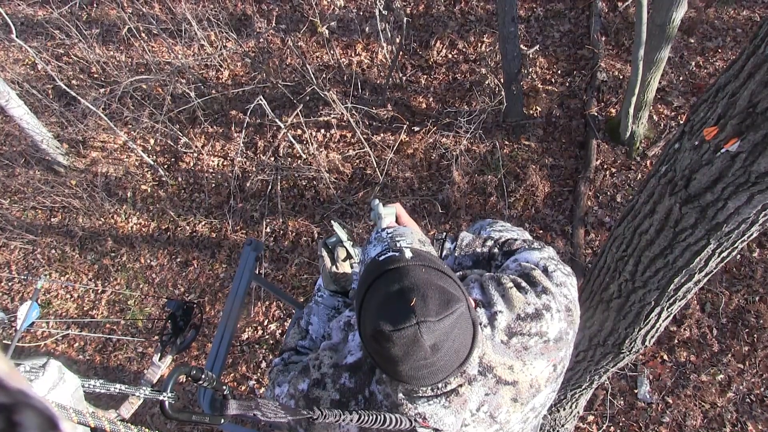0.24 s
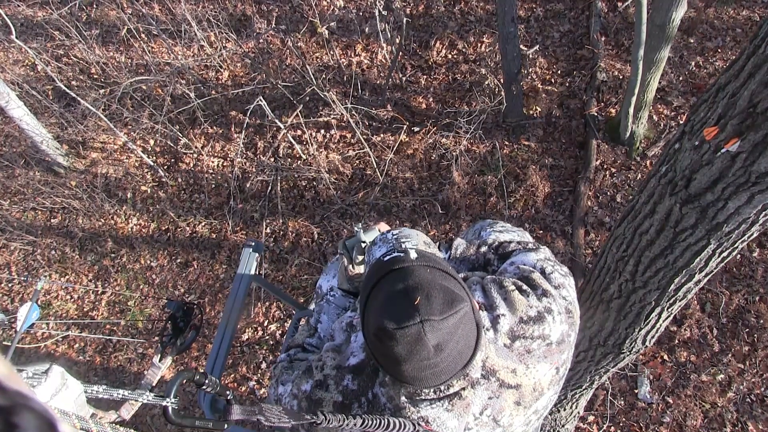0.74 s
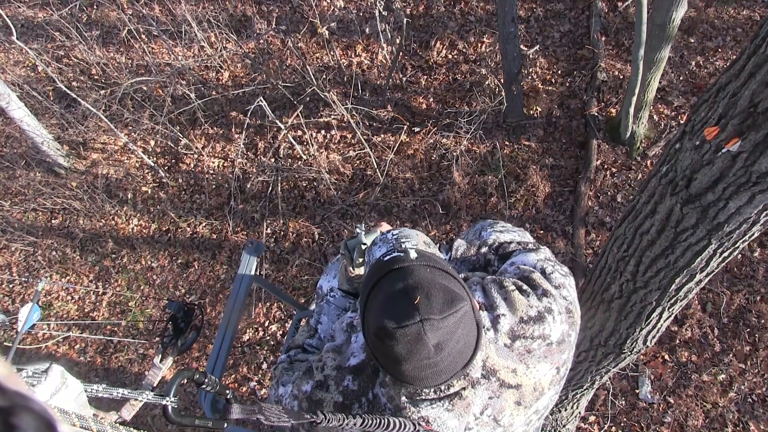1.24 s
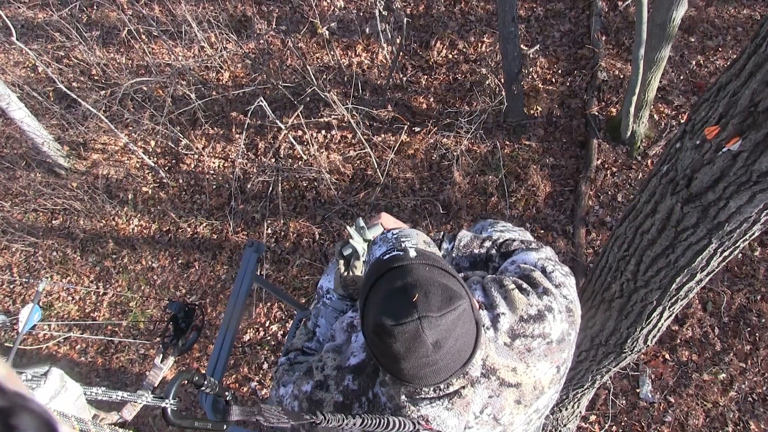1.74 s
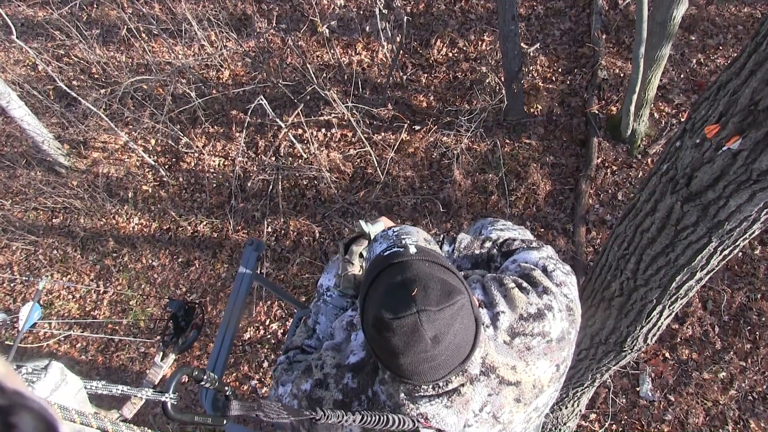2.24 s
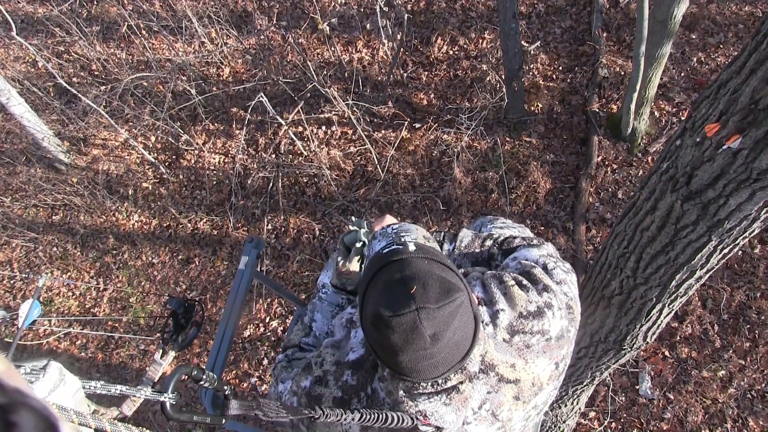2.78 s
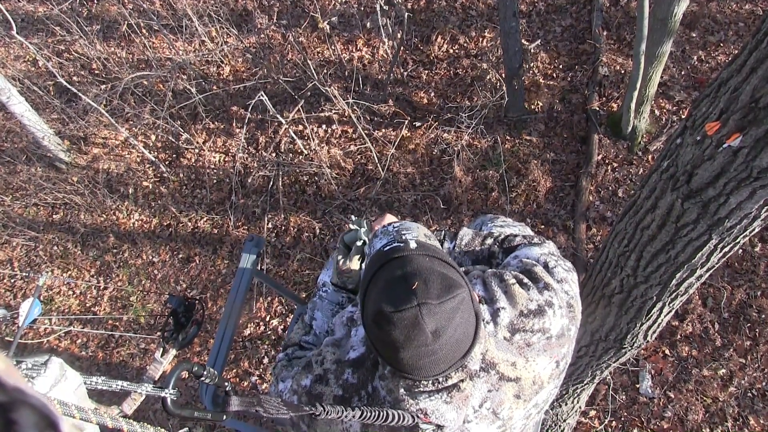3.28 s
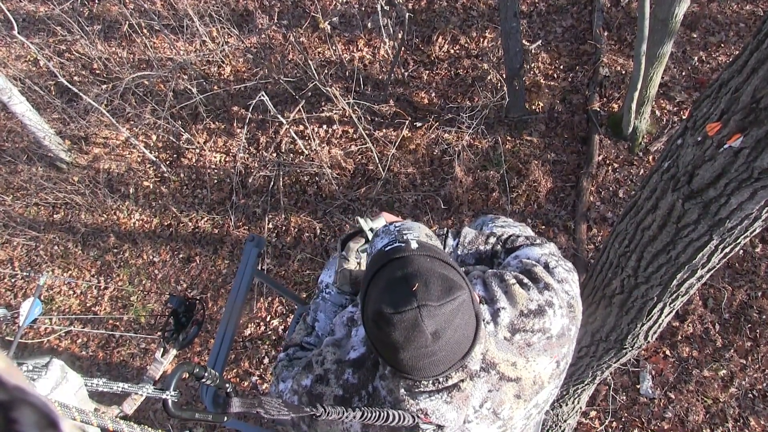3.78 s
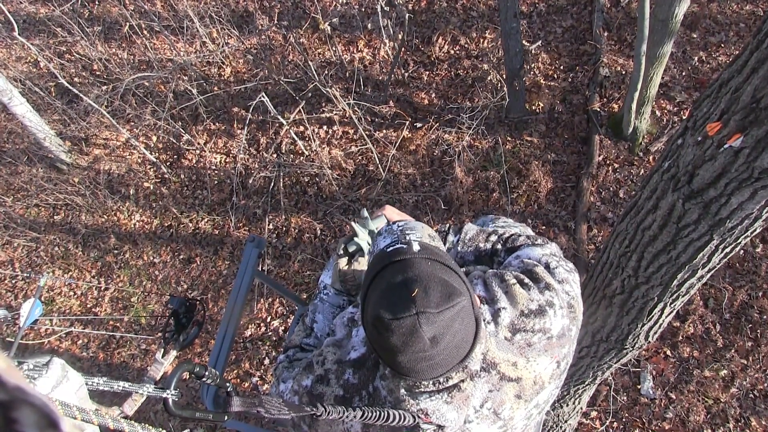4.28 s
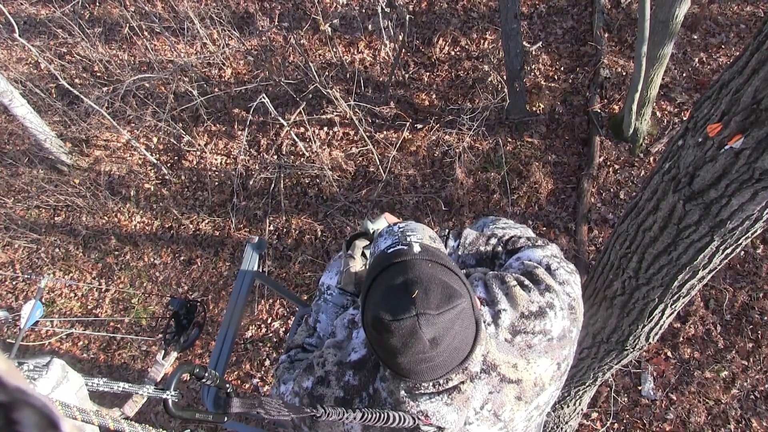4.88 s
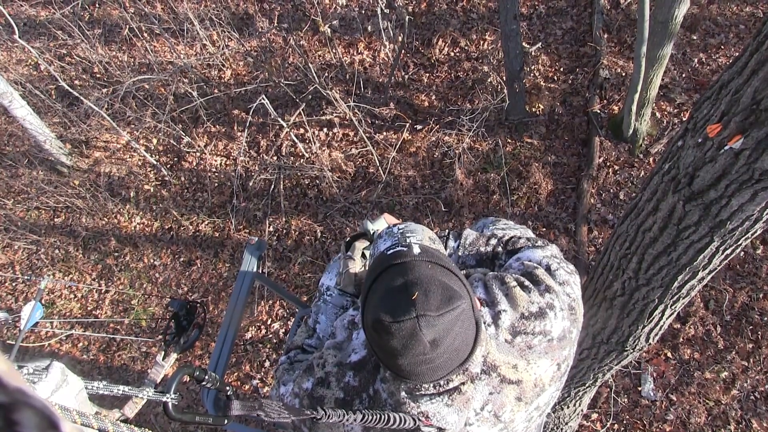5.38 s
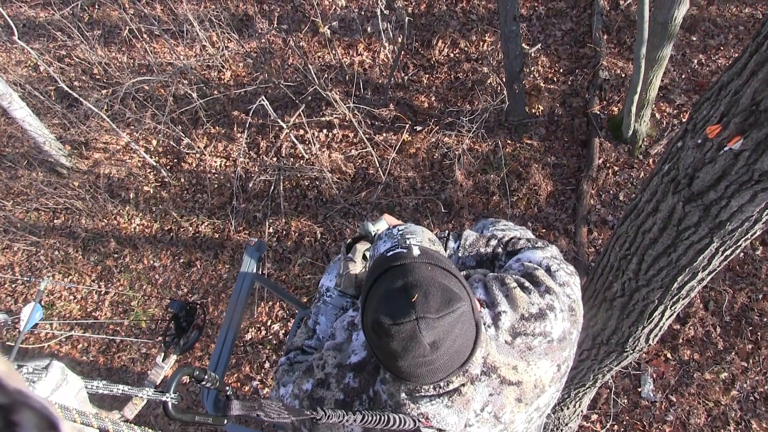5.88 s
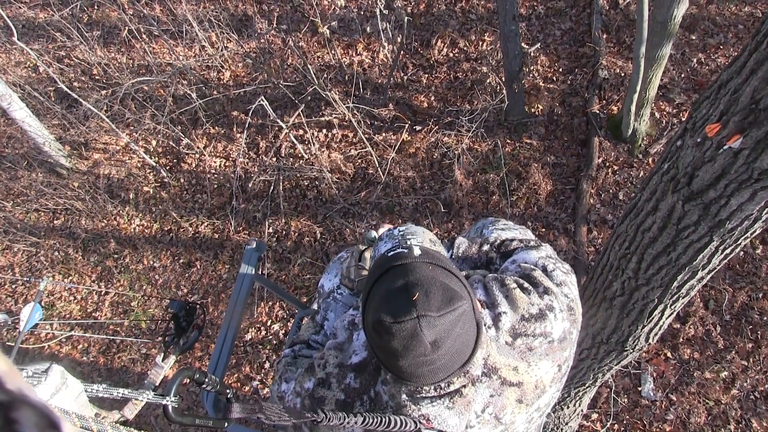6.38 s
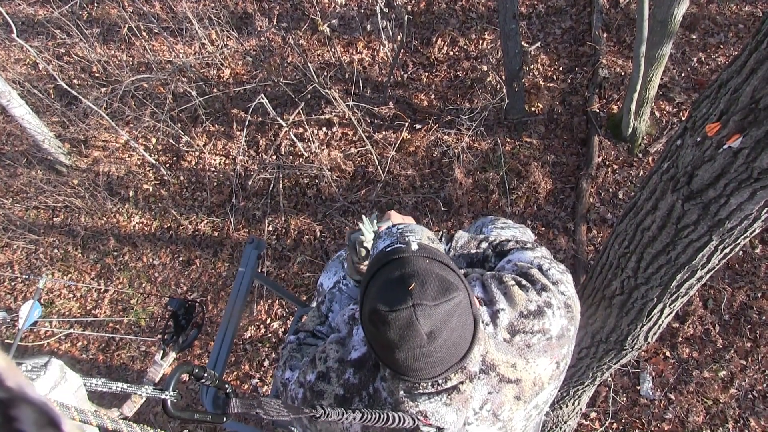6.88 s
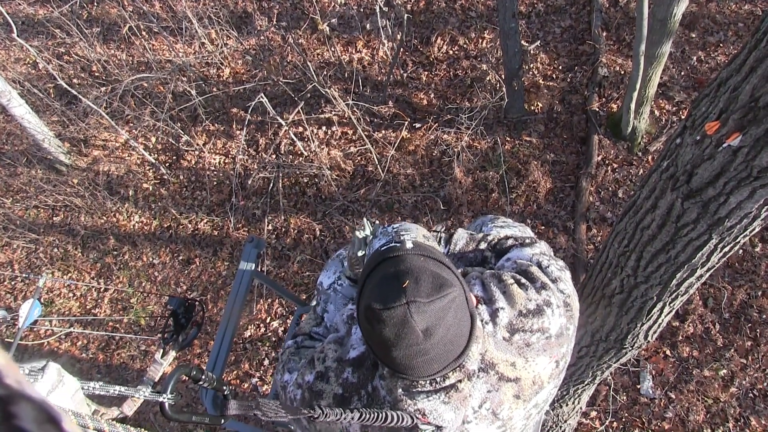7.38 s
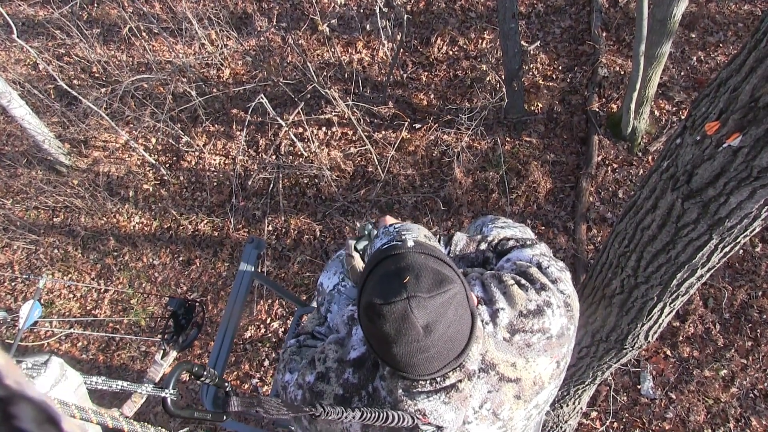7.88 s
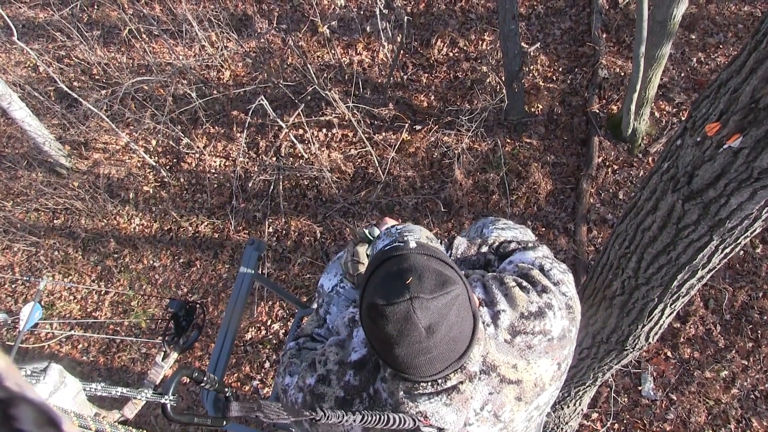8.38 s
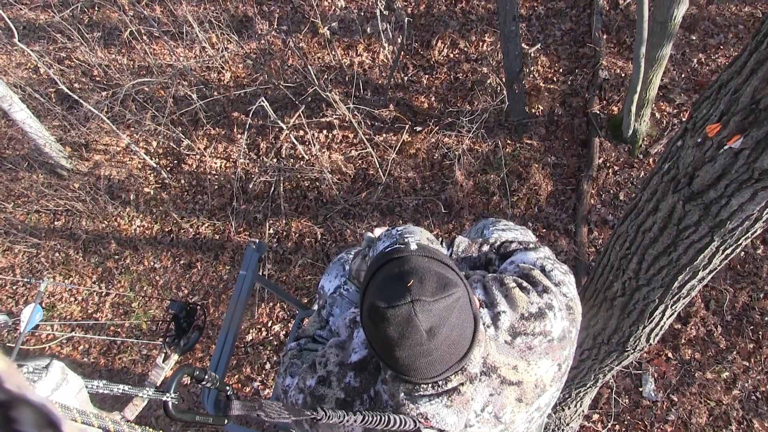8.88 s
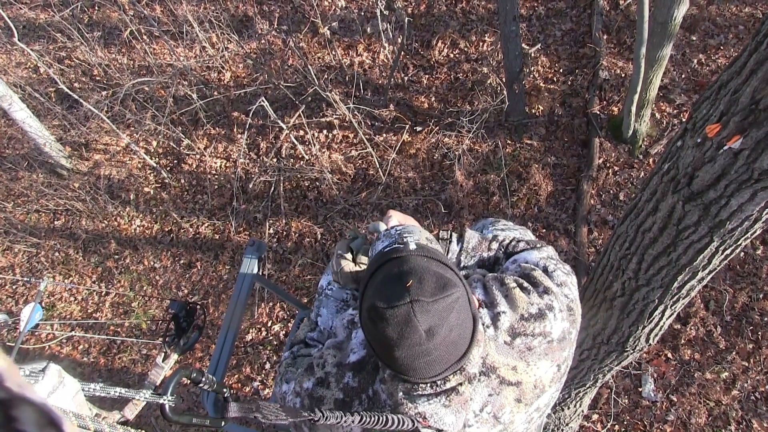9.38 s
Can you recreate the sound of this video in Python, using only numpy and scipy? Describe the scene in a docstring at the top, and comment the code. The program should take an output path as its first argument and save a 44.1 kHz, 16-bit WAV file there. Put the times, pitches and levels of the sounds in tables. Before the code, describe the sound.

In quiet leafless woods, hard hollow plastic clacks together near a single microphone. One sharp knock comes first, then busy runs of clicks, a longer pause in the middle, and further short clattering bursts, brighter and more hollow, to the end. Small scrapes lead into some knocks, a diffuse tail follows loud ones, and soft airy rumble continues beneath.

```python
"""Knobbed rattle high in a tree

A hand-held rattle of two hollow, knobbed plastic halves is knocked and twisted together in short bouts.
It stands close to a single microphone channel: each contact rings short body modes as damped sines,
and scrapes ring them with dense small slips. The trunks around send back a late, soft tail of noise.
Air and far rumble, as shaped noise, fill the pauses; a few low falling thumps come through the mount.
The recorder's limiter ducks loud knocks and recovers at a steady rate."""
import sys
import numpy as np
from scipy import signal
from scipy.fft import rfft, irfft
from scipy.io import wavfile

SR = 44100
rng = np.random.default_rng(int(sys.argv[2]) if len(sys.argv) > 2 else 0)


def digitize_waveform(pressure):
    """Quantize a signal to 16-bit integers and store it at the path in sys.argv[1].

    Rows of a 2-D input are taken as channels; values are limited to [-1, 1].
    """
    field = np.atleast_2d(pressure).T
    bounded = np.clip(field, -1, 1)
    quanta = np.round(bounded * 32767).astype(np.int16)
    wavfile.write(sys.argv[1], SR, quanta)


N = 425124   # length in samples


def from_db(db):
    """Decibels to gain."""
    return 10 ** (np.asarray(db) / 20)


def coloured(size, spectrum):
    """Noise with the given spectrum, interpolated over log frequency and scaled to an rms of 1."""
    hz, level_db = np.transpose(spectrum)
    bins = np.maximum(np.arange(size // 2 + 1) * SR / size, 1)
    gain = from_db(np.interp(np.log(bins), np.log(hz), level_db))
    noise = irfft(rfft(rng.standard_normal(size)) * gain, size)
    return noise / np.sqrt(np.mean(noise ** 2) + 1e-20)


# Spectrum of air and far rumble: f/Hz, relative level/dB (per Hz)
AIR_SPECTRUM = [(15, -34), (25, -15), (150, 1), (329, -2), (409, -8), (742, -9), (1000, -12.5),
                (2140, -12.5), (2520, -9.5), (4330, -11), (8080, -18.5), (15100, -37), (16400, -52)]
# Slow growth of the air, steady before and after: t/s, level/dB
AIR_GROWTH = [(5, 1), (7, 2.5)]
AIR_DB = -49   # base level/dB; the growth curve adds to it, so the air's rms is -48 dB before 5 s


def air():
    """Air and far rumble around the tree: steady shaped noise under a slowly rising level."""
    growth_db = np.interp(np.arange(N) / SR, *np.transpose(AIR_GROWTH))
    return from_db(AIR_DB + growth_db) * coloured(N, AIR_SPECTRUM)


# Hold of the hand; a tighter one damps rings and bounces, shifts the upper rings and lets out hollow and crack:
# t/s, main t60 share, hollow level/dB, crack level/dB, upper t60 share, bounce time share, upper pitch share
HAND_GRIP = [(5, 0.93, -15.5, -12.5, 0.84, 0.95, 0.98), (6.5, 0.59, -7, -12, 0.88, 0.64, 1.03),
             (7.35, 0.52, -6.5, -9, 0.48, 0.66, 0.86), (7.6, 0.58, -8.5, -11.5, 0.65, 0.7, 0.97),
             (9.15, 0.63, -7.5, -10.5, 0.84, 0.65, 0.95), (9.26, 0.6, -4, -15.5, 0.89, 0.56, 0.96)]


def grip(column):
    """The hand's hold changes gradually: one grip column, interpolated at each knock."""
    hold = np.array(HAND_GRIP)
    return np.interp(np.array(KNOCK_EVENTS)[:, :1], hold[:, 0], hold[:, column])


def with_bounces(count, graze_s, within_s, first_db, spread_db):
    """Knobs touch at random around each knock: sample positions and dB, shaped (knocks, 1 + count)."""
    knocks = len(KNOCK_EVENTS)
    draws = rng.random((knocks, 2, count))
    delay = (graze_s + within_s) * draws[:, 0] - graze_s
    drop_db = first_db - spread_db * draws[:, 1]
    # grazes ahead of the knock are lighter than bounces after it
    drop_db -= 20 * (delay < 0)
    # later bounces are weaker
    drop_db -= 13.0 * np.maximum(delay, 0) / within_s
    none = np.zeros(knocks)
    knock_s = np.array(KNOCK_EVENTS)[:, :1]
    at = ((knock_s + np.c_[none, delay] * grip(5)) * SR).astype(int)
    return at, np.c_[none, drop_db]


HOLLOW_FOLLOWS = 0.76   # dB of hollow ring per dB of strength
CRACK_FOLLOWS = 0.69   # dB of crack per dB of the upper rings above the strength
KNOCK_SCATTER_DB = 2   # hollow ring and crack vary from knock to knock


def shares():
    """A square knock rings the main mode, a glancing one the upper rings and crack; grip sets hollow and crack."""
    _, strength_db, glance_db = np.array(KNOCK_EVENTS).T[:, :, None]
    main_db = strength_db - 10 * np.log10(1 + from_db(glance_db) ** 2)
    upper_db = main_db + glance_db
    chance_db = KNOCK_SCATTER_DB * rng.standard_normal((len(KNOCK_EVENTS), 2, 1))
    hollow_db = grip(2) + HOLLOW_FOLLOWS * strength_db + chance_db[:, 0]
    crack_db = strength_db + grip(3) + CRACK_FOLLOWS * (upper_db - strength_db) + chance_db[:, 1]
    return main_db, hollow_db, upper_db, crack_db


def ring(hz, t60, rise_s):
    """Damped sines along the last axis that swell over the time of contact."""
    t = np.arange(int(np.max(t60) * SR)) / SR
    envelope = from_db(-60 * t / t60) * (1 - np.exp(-t / rise_s))
    return np.sin(2 * np.pi * hz[..., None] * t) * envelope[:, None]


# Knocks of the halves: t/s, relative strength level/dB, glance level/dB (upper rings above the main ring)
KNOCK_EVENTS = [(0.7013, 10.5, -21), (0.7095, 2.5, -13), (0.7159, -3, 16), (0.7192, 4, 0),
                (1.427, -3.5, -9.5), (1.455, -10.5, -3), (1.4653, -3.5, -2), (1.471, -6, -2),
                (1.489, -1.5, -14.5), (1.5182, -12.5, -8), (1.531, -18, -6), (1.55, -14, 8),
                (1.561, -16, -19), (1.5696, -20, -5), (1.5862, 7, 12), (1.595, -3, -25), (1.6003, 3.5, -19),
                (1.6044, -2, -11), (1.616, 0, -6), (1.623, -3, -9), (1.6298, 6, -9), (1.7057, -15.5, -12),
                (1.7442, -5.5, -1), (1.7638, 6, -28), (1.7672, -7, 4), (1.775, 7.5, -4), (1.788, -10, 10),
                (1.7926, -8, -3), (1.8051, 9.5, -16), (1.8243, -5.5, 19), (1.8422, -5.5, -27),
                (1.868, 2, -13), (1.895, -26, 20), (2.1982, -7, 4), (2.2059, 17.5, -18), (2.2118, 16, -9),
                (2.3098, -13, -14), (2.5539, -14, -13), (2.5592, 5.5, -12), (2.576, -9, -5),
                (2.5832, 5, -12), (2.5979, -2.5, -11), (2.6131, -4, -6), (2.8666, 7.5, -9.5),
                (2.9371, -20.5, -4), (3.4171, -6.5, -8), (3.4197, -5.5, 10), (3.4314, -2, -29),
                (3.4522, -16, -2), (3.4678, 1.5, -5), (3.5284, -12.5, 0.5), (3.5417, -21, -8),
                (3.558, -24, 10), (3.7119, -1, -14), (3.775, -8, -5.5), (3.785, -20, -7),
                (3.7948, -8.5, -15), (3.8114, -3, -6.5), (3.82, 0.5, -14), (3.838, -6, -15),
                (3.848, -9.5, -18), (3.906, -10.5, -16.5), (3.9447, -15, -8), (3.9603, -15, -11),
                (3.9661, 2.5, -22), (3.9729, 1.5, 2.5), (3.9881, -6.5, -7), (4.0061, 3, -1.5),
                (4.0253, -7.5, -11), (4.038, -4, -2), (4.1156, -24, -4), (4.141, -11.5, -6),
                (4.161, 0, -22), (4.1628, -3, -10), (4.1722, -8, -8), (4.1925, -6, -9), (4.2, -8.5, 1.5),
                (4.2148, 7, -12), (4.226, -13, -3), (4.267, -8, 6), (4.2749, -8, 10), (4.8902, 14, -11),
                (4.9013, 12, -2), (4.913, -20, 2), (4.9197, 7, 0), (4.9255, -26, 11), (6.6692, -2, -1.5),
                (6.6885, -13, 14), (6.7, -13, -6), (6.7573, -34, -11), (6.789, -28, -15),
                (6.7981, -16.5, 10), (6.8042, -12, -24), (6.93, -27, -9), (6.9425, -9.5, -11),
                (7.0417, -32, -1), (7.0671, 2.5, 12), (7.1014, -17, -2), (7.1122, -13.5, -7), (7.35, 6, 10),
                (7.3527, 16.5, 1.5), (7.3771, -4.5, -17), (7.6846, -6, -7), (7.7064, -19, 7),
                (7.7122, 12, -4.5), (7.7204, 11, -9), (7.7256, -5, 5), (7.7306, 11, -6), (7.7391, 6, 17),
                (7.7746, -5.5, -19), (7.78, -8, -2), (7.8027, -8.5, -18), (7.8308, -11, 0),
                (7.9416, -5, -4), (7.957, -13, -17), (7.9737, -15, -7), (7.9834, 2, -9.5),
                (7.9885, 6.5, -6), (8.3137, -34.5, -11), (8.7074, -2.5, -22), (8.712, -5, 0.5),
                (8.7323, -4.5, -6), (8.7474, -12, -3), (8.7555, 7, -11), (8.8128, -18.5, 3),
                (8.8604, -18.5, 0), (9.1943, 7, -10), (9.2083, -1.5, 1), (9.2265, -4, 0), (9.2286, -9, -9),
                (9.2325, 1, -2), (9.2355, 1, 5), (9.248, -10, 4), (9.259, 0, 9), (9.2731, -15, -23),
                (9.2803, -12.5, -16), (9.3256, -29, -28), (9.331, -17.5, 8)]
# Body modes, one table for each way a contact can favour the body; grip rescales main t60, upper t60 and upper f.
# Main ring of the body: f/Hz, relative level/dB, t60/s
MAIN_MODES = [(2172, -2, 0.022), (2039, 1, 0.018), (1845, -16, 0.057), (2244, -5, 0.038)]
# Ring of the hollow halves: f/Hz, relative level/dB, t60/s
HOLLOW_MODES = [(1462, 2.5, 0.014), (1207, -6.5, 0.014), (1728, -2.5, 0.019)]
# Upper rings, favoured by glancing knocks: f/Hz, relative level/dB, t60/s
UPPER_MODES = [(3614, 0, 0.018), (3264, -10, 0.028), (3173, -8, 0.03), (2827, -2.5, 0.014),
               (4280, -14.5, 0.012)]
# Bright crack: f/Hz, relative level/dB, t60/s
CRACK_MODES = [(4460, 1.5, 0.0067), (4790, -9, 0.028), (5634, -2, 0.015), (6700, 0, 0.0067),
               (7650, -10.5, 0.013), (9100, -14.5, 0.015), (11060, -12.5, 0.0037), (12300, -22.5, 0.0068),
               (14600, -20, .003)]
# Dull push of the contact itself: f/Hz, relative level/dB, t60/s
PUSH_MODES = [(390, -16, 0.014), (784, -8, 0.0072)]


def rattle():
    """Every contact strikes each body mode with its own strength, sign and slight detuning."""
    at, drop_db = with_bounces(count=6, graze_s=.003, within_s=.014, first_db=-1, spread_db=11.5)
    main_db, hollow_db, upper_db, crack_db = shares()
    main_t60, upper_t60, upper_pitch = grip(1), grip(4), grip(6)
    same = np.ones_like(main_t60)
    # modes, strike dB, contact s, detune share, strength scatter dB, t60 share, pitch share
    # small contacts lose most of the main ring and least of the hollow ring
    groups = [(MAIN_MODES, main_db + 0.5 + 1.29 * drop_db, .0006, .007, 1.6, main_t60, same),
              (HOLLOW_MODES, hollow_db + 0.64 * drop_db, .0007, .015, 3, same, same),
              (UPPER_MODES, upper_db - 1.0 + 0.83 * drop_db, .0003, .04, 3, upper_t60, upper_pitch),
              (CRACK_MODES, crack_db + 0.77 * drop_db, .00015, .05, 3, same, same),
              (PUSH_MODES, crack_db + drop_db, .0002, .1, 3, same, same)]
    out = np.zeros(N)
    for modes, strike_db, rise_s, detune, scatter_db, t60_share, pitch_share in groups:
        for hz, mode_db, t60 in modes:
            chance = rng.standard_normal((len(KNOCK_EVENTS), 3, at.shape[1]))
            # the knock itself is the steadiest contact: half the scatter
            chance[:, 0, 0] *= .5
            sizes = from_db(strike_db + mode_db + scatter_db * chance[:, 0]) * np.sign(chance[:, 1])
            contact_hz = hz * pitch_share * (1 + detune * chance[:, 2])
            rings = ring(contact_hz, t60 * t60_share, rise_s)
            for (knock, contact), i in np.ndenumerate(at):
                out[i:i + rings.shape[-1]] += sizes[knock, contact] * rings[knock, contact]
    return out


# Colour of the tail from the trunks, before its treble fades faster: f/Hz, relative level/dB
WOODS_COLOUR = [(600, 3.5), (1500, -2), (2150, -4.5), (2900, 4.5), (5000, 8), (12000, 4.5)]


def woods(x, level_db, first_s, swell_s, t60, treble_hz, treble_t60):
    """Scatter from many trunks: nothing at first, a swell, then a slow fade, faster in the treble."""
    t = np.arange(2 * SR) / SR
    late = np.maximum(t - first_s, 0)
    scatter = coloured(len(t), WOODS_COLOUR) * (1 - np.exp(-late / swell_s))
    low = signal.sosfilt(signal.butter(2, treble_hz, fs=SR, output="sos"), scatter)
    treble = scatter - low
    tail = low * from_db(-60 * late / t60) + treble * from_db(-60 * late / treble_t60)
    tail /= np.sqrt(np.sum(tail ** 2))   # unit energy
    return from_db(level_db) * signal.fftconvolve(x, tail)[:N]


# Low bumps in the mount: t/s, level/dB (before onset and decay), start f/Hz, end f/Hz, t60/s
MOUNT_THUMPS = [(1.095, -36, 108.5, 49.4, 0.12), (1.545, -44, 90, 44.8, 0.16), (2.14, -37, 90, 49.7, 0.067),
                (5.253, -29, 280, 29.8, 0.19)]


def thumps():
    """A bump travels through the mount, its higher part first: a decaying sine that falls in pitch."""
    out, t = np.zeros(N), np.arange(SR // 3) / SR
    for s, level_db, start_hz, end_hz, t60 in MOUNT_THUMPS:
        hz = end_hz + (start_hz - end_hz) * np.exp(-t / 0.017)
        shape = (1 - np.exp(-t / 0.0034)) * from_db(level_db - 60 * t / t60)
        i = round(s * SR)
        out[i:i + len(t)] += shape * np.sin(2 * np.pi * np.cumsum(hz) / SR)
    return out


# Knobs scrape past each other, pressing harder until they slip: t/s, length/s, level/dB at the end
KNOB_SCRAPES = [(1.412, 0.025, -30), (2.533, 0.021, -32.5), (3.668, 0.034, -39.5), (3.729, .04, -36.5),
                (4.235, .03, -36), (6.655, .012, -34), (6.774, 0.031, -32.5), (6.905, 0.03, -38.5),
                (7.08, 0.023, -33), (7.668, 0.018, -36), (8.688, 0.019, -34), (9.165, 0.027, -31.5)]
SLIPS_PER_S, SCRAPE_RISE_DB = 900, 6.5
SCRAPE_UPPER_DB, SCRAPE_HOLLOW_DB = -5, -13   # relative to the main ring


def scrapes():
    """Dense faint slips of uneven size ring the main, upper and hollow body modes."""
    level = np.zeros(N)
    for s, length_s, end_db in KNOB_SCRAPES:
        i, n = round(s * SR), round(length_s * SR)
        level[i:i + n] = from_db(end_db + SCRAPE_RISE_DB * np.linspace(-1, 0, n))
    # sparse random slips, scaled so that their density does not change the level
    slips = level * (rng.random(N) < SLIPS_PER_S / SR) * np.sqrt(SR / SLIPS_PER_S)
    out, t = np.zeros(N), np.arange(SR // 20) / SR
    groups = [(MAIN_MODES, 0), (UPPER_MODES, SCRAPE_UPPER_DB), (HOLLOW_MODES, SCRAPE_HOLLOW_DB)]
    for modes, group_db in groups:
        body = np.zeros(len(t))
        for hz, mode_db, t60 in modes:
            body += from_db(mode_db - 60 * t / t60) * np.sin(2 * np.pi * hz * t)
        body /= np.sqrt(np.sum(body ** 2))   # unit energy
        uneven_slips = slips * rng.standard_normal(N)
        out += from_db(group_db) * signal.oaconvolve(uneven_slips, body)[:N]
    return out


def scene():
    """Air, the close rattle and its scrapes, their tail from the trees, and thumps in the mount."""
    contacts = rattle() + scrapes()
    tail = woods(contacts, level_db=-22, first_s=0.011, swell_s=0.0022, t60=0.8,
                 treble_hz=4450, treble_t60=0.36)
    return (contacts + tail + thumps() + air())[None]


LIMIT_DB, ATTACK_S, RELEASE_DB_PER_S = -1, .0004, 124
CUTOFF_HZ = 16700


def record(dry):
    """The limiter looks ahead, ducks on peaks and recovers at a steady rate; the top is cut."""
    ramp = RELEASE_DB_PER_S * np.arange(N) / SR
    over_db = np.maximum(20 * np.log10(np.abs(dry) + 1e-9) - LIMIT_DB, 0)
    # a running maximum against the ramp makes each reduction fall back at the release rate
    held_db = np.maximum.accumulate(over_db + ramp, axis=-1) - ramp
    a = np.exp(-1 / (ATTACK_S * SR))
    smooth_db = signal.lfilter([1 - a], [1, -a], held_db)
    # look ahead by three attack times
    ahead_db = np.roll(smooth_db, -round(3 * ATTACK_S * SR), axis=-1)
    ducked = np.clip(dry * from_db(-ahead_db), -1, 1)
    return signal.sosfilt(signal.cheby2(18, 90, CUTOFF_HZ, fs=SR, output="sos"), ducked)


dry = scene()
out = record(dry)
digitize_waveform(out)
```